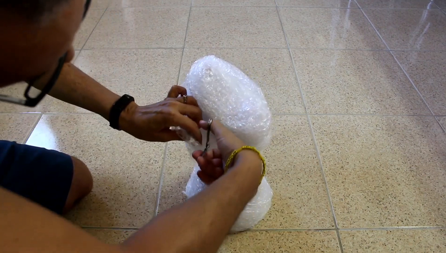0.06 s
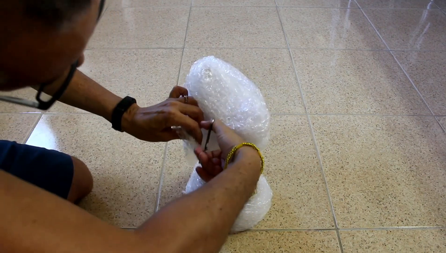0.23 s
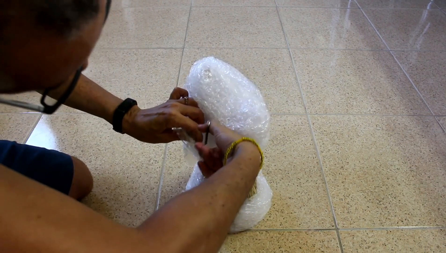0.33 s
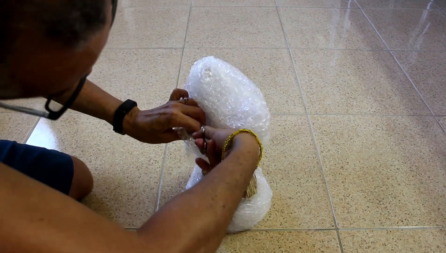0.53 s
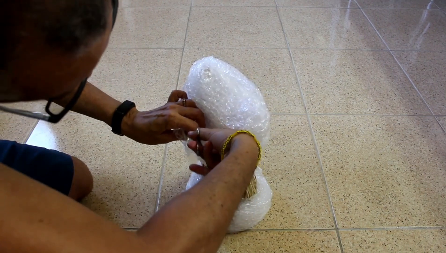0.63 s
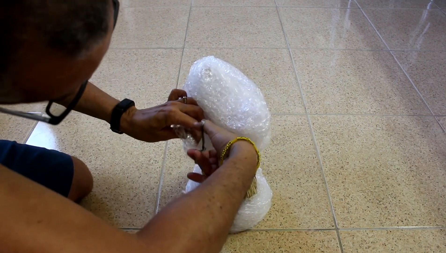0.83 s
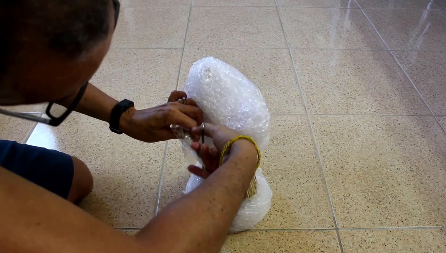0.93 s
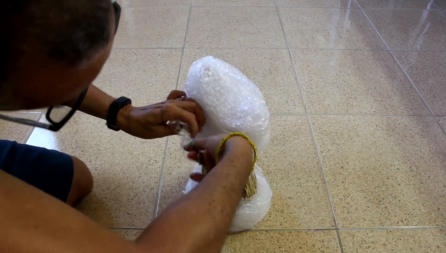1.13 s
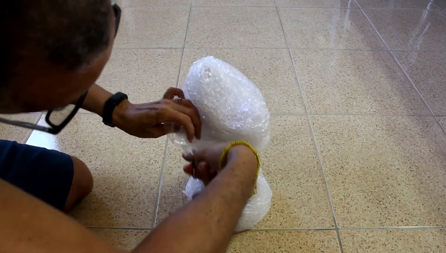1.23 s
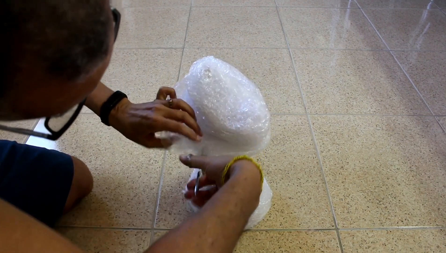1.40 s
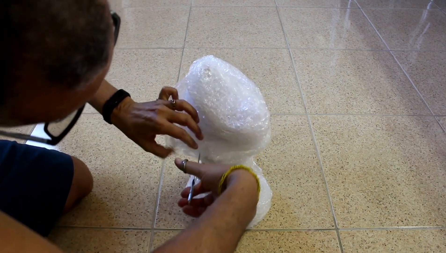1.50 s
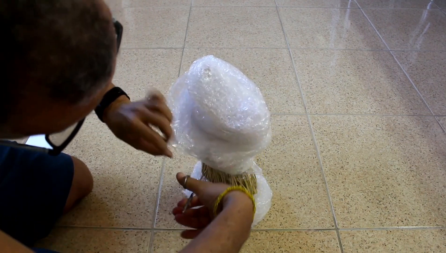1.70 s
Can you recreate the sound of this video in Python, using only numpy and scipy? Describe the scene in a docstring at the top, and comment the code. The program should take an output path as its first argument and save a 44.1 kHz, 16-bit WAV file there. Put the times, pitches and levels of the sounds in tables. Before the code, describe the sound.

Bubble wrap crinkles and pops sharply under scissors, with soft thuds over a low hum.

```python
"""In a bare, echoing room with a tiled floor, scissors work through bubble wrap around a parcel.
A low hum lies under everything, and the wrap crinkles in the hands as its tiny creases snap.
The film ticks under the blades, then bubbles burst in two sharp clusters, each with a bright echo.
Hands and scissors also bump the padded parcel, which answers with soft, dull thuds."""
import sys
import numpy as np
from scipy import signal
from scipy.fft import rfft, irfft
from scipy.io import wavfile

SR = 44100
rng = np.random.default_rng(int(sys.argv[2]) if len(sys.argv) > 2 else 0)


def wav_record(signal):
    """Record a signal, one row per channel, as 16-bit PCM in the file named by sys.argv[1]."""
    frames = np.transpose(np.atleast_2d(signal))
    bounded = np.clip(frames, -1, 1)
    # unit amplitude maps onto the largest positive 16-bit level
    quanta = np.round(bounded * 32767).astype(np.int16)
    wavfile.write(sys.argv[1], SR, quanta)


N = 77175
TIME = np.arange(N) / SR
BIN_HZ = np.maximum(np.arange(N // 2 + 1) * SR / N, 1)  # the frequency of each point in a spectrum


def from_db(db):
    """Turn decibels into a number to multiply by."""
    return 10 ** (np.asarray(db) / 20)


def rms_one(x):
    """Scale a sound so that its average strength (rms) is 1."""
    return x / np.sqrt(np.mean(x ** 2) + 1e-20)


def at_hz(points, hz):
    """Read between the rows of a frequency table, with all octaves equally wide."""
    row_hz, value = np.transpose(points)
    return np.interp(np.log(hz), np.log(row_hz), value)


def coloured(x, spectrum):
    """Turn each frequency up or down as a table says."""
    return irfft(rfft(x) * from_db(at_hz(spectrum, BIN_HZ)), N)


def resonate(x, hz, q):
    """Let through the sound around one pitch; a low q makes the band wide."""
    angle = 2 * np.pi * hz / SR
    width = np.sin(angle) / (2 * q)
    return signal.lfilter([width, 0, -width], [1 + width, -2 * np.cos(angle), 1 - width], x + 1e-18)


def low_pass(x, hz, order=2):
    """Soften everything above hz."""
    return signal.sosfilt(signal.butter(order, min(hz, SR / 2 - 1000), fs=SR, output="sos"), x)


def diffuse_noise():
    """Stereo noise arriving from all around: alike in the bass, nearly unrelated in the high treble."""
    # how alike left and right are: f/Hz, correlation (1 = the same)
    likeness = [(60, 0.84), (250, 0.89), (1000, 0.71), (2000, 0.61), (4000, 0.6), (7500, 0.25),
                (14000, -0.2)]
    alike = np.clip(at_hz(likeness, BIN_HZ), -1, 1)
    mid, side = rfft(rng.standard_normal((2, N)))
    return irfft(np.sqrt(1 + alike) * mid + np.sqrt(1 - alike) * side * [[1], [-1]], N)


def room_hum():
    """The room rumbles and hisses steadily, with three low tones that waver in loudness."""
    # tone of the rumble and hiss: f/Hz, relative level/dB
    noise_colour = [(25, -24), (42, -16), (56, 1.5), (75, -7.5), (100, -11.5), (140, -1.5), (200, -6.5),
                    (260, 0), (330, -9), (480, -3), (750, -13.5), (2000, -15.5), (6000, -19),
                    (12000, -27.5), (16000, -38)]
    # humming tones: f/Hz, level/dB
    hum_tones = [(57, -63), (179, -62.5), (243, -56.5)]
    sound = from_db(-46) * rms_one(coloured(diffuse_noise(), noise_colour))
    for hz, db in hum_tones:
        waver = rms_one(low_pass(rng.standard_normal(2 * N), hz=5.7)[N:])
        tone = np.sin(2 * np.pi * (hz * TIME + rng.random()))
        sound += from_db(db) * (1 + 0.66 * waver) * tone
    return sound


def room_echo():
    """The bare room answers a click with many reflections that swell, then die away band by band."""
    # time the echo takes to fade by 60 dB: f/Hz, t/s
    fade_times = [(150, 0.86), (500, 1), (1200, 0.89), (3000, 0.87), (7000, 0.83), (14000, 0.57)]
    # tone of the echo: f/Hz, relative level/dB
    echo_colour = [(100, 5.5), (400, 0), (900, 0.5), (1800, -1.5), (3200, -4), (5500, -1), (8000, 1.5),
                   (12000, 2), (15500, 1.5)]
    delay_s, build_s = 0.0036, 0.011
    spectrum, tail = rfft(diffuse_noise()), 0
    centres_hz = np.geomspace(100, 16000, 16)
    for hz, this_band in zip(centres_hz, np.eye(len(centres_hz))):
        band = irfft(spectrum * np.interp(np.log(BIN_HZ), np.log(centres_hz), this_band), N)
        tail += band * np.exp(-np.log(1000) * TIME / at_hz(fade_times, hz))
    swell = 1 - np.exp(-np.maximum(TIME - delay_s, 0) / build_s)
    return rms_one(coloured(tail, echo_colour) * swell) / np.sqrt(N)


def convolve(x, response):
    """Play a one-channel sound through a pattern of echoes."""
    return signal.fftconvolve(np.atleast_2d(x), np.atleast_2d(response), axes=1)[:, :N]


def wrap_crinkle(room):
    """Tiny creases of uneven size snap at random while the film is handled."""
    # how hard the wrap is handled: t/s, relative level/dB
    handling = [(0, -43.5), (.1, -46), (.2, -47.5), (.33, -40.5), (.47, -40.5), (.62, -39.5), (.8, -48.5),
                (.93, -40.5), (1.0, -38.5), (1.15, -45), (1.37, -37.5), (1.42, -35), (1.5, -41.5),
                (1.56, -46), (1.62, -49), (1.68, -73), (1.75, -64)]
    # tone of the creases: f/Hz, relative level/dB
    crease_colour = [(300, -27), (700, 1), (1500, 1.5), (3000, 3), (6000, -6.5), (10000, -11),
                     (15000, -23.5)]
    snaps_per_s, spread_db = 900, 4.5
    sizes = from_db(spread_db * np.minimum(rng.exponential(1, N), 4))
    signs = rng.choice([-1, 1], N)
    snaps = sizes * signs * (rng.random(N) < snaps_per_s / SR)
    loudness = from_db(np.interp(TIME, *np.transpose(handling)))
    film = rms_one(coloured(snaps, crease_colour)) * loudness
    return from_db(-8.5) * film + from_db(-2) * convolve(film, room)


def bubble_pops(room):
    """The blades snap the film or burst a bubble: one sharp pressure swing, then flutter and echoes."""
    # ticks and pops: t/s, peak level before echoes/dB, pitch f/Hz, treble edge f/Hz, extra room level/dB
    pops = [(.1190, -25.5, 1720, 3000, 0), (0.1825, -26, 2780, 5940, 5.5), (.2328, -19.5, 1500, 8900, -0.5),
            (.3729, -9.5, 1850, 5460, -1), (0.4531, -20.5, 4400, 11800, 2.5), (.5452, -4, 2730, 10300, 4.5),
            (.6022, -10.5, 2380, 7000, -2.5), (0.6035, -16, 3450, 9100, 4.5),
            (1.0153, -14.5, 1620, 13000, 7), (1.0166, -20.5, 1610, 4000, 0),
            (1.0218, -14.5, 1410, 3020, -1), (1.0628, -5.5, 3500, 12900, 2.5)]
    # echoes off the hands, parcel and floor: rough delay t/s, relative level/dB
    near_echoes = [(.0013, -6), (.0030, -6), (.0062, -6.5), (0.0143, -17)]
    flaps_per_s, flutter_fade_s = 1500, 0.0039
    direct, into_room = np.zeros((2, N))
    for start_s, db, hz, edge_hz, room_db in pops:
        click = np.zeros(N)
        click[int(start_s * SR)] = -1
        pulse = low_pass(resonate(click, hz, q=0.97), edge_hz)
        pulse *= from_db(db) / np.abs(pulse).max()
        flaps = (rng.random(N) < flaps_per_s / SR) * rng.standard_normal(N)  # the torn film flutters
        repeats = flaps * from_db(-3) * np.exp(-TIME / flutter_fade_s)
        repeats[0] = 1  # the pop itself
        for delay_s, echo_db in near_echoes:
            repeats[int(delay_s * rng.uniform(0.9, 1.1) * SR)] += from_db(echo_db)
        direct = direct + convolve(pulse, repeats)
        into_room += pulse * from_db(room_db)
    return direct + from_db(8.5) * convolve(into_room, room)


def parcel_bumps(room):
    """The padded parcel answers a push with a dull thud that dies quickly."""
    # bumps of hands and scissors: t/s, level before rise and fade/dB, f/Hz, fade t/s
    bumps = [(0.233, -30.5, 390, 0.011), (.372, -33, 345, .012), (1.016, -35, 190, .03),
             (1.026, -36, 620, 0.042), (1.063, -37, 220, 0.023), (1.408, -36.5, 455, 0.049),
             (1.421, -33, 188, 0.027), (1.55, -47, 220.5, 0.094)]
    rise_s, q = 0.004, 1.23
    thuds = 0
    for start_s, db, hz, fade_s in bumps:
        age = np.maximum(TIME - start_s, 0)
        body = rms_one(resonate(resonate(rng.standard_normal(N), hz, q), hz, q))
        thuds += from_db(db) * body * (1 - np.exp(-age / rise_s)) * np.exp(-age / fade_s)
    return thuds + from_db(-3.5) * convolve(thuds, room)


def scene():
    """Pops, bumps and crinkles echo in the same room, over its hum."""
    room = room_echo()
    return bubble_pops(room) + parcel_bumps(room) + wrap_crinkle(room) + room_hum()


def record(dry):
    """The shaded left sound inlet hears less bass and middle; both sides lose the highest treble."""
    left, right = dry
    shade_db, cutoff_hz = -8.5, 15700
    left = left + (from_db(shade_db) - 1) * low_pass(left, hz=4200, order=1)
    treble_cut = signal.ellip(10, 0.2, 80, cutoff_hz, fs=SR, output="sos")
    return signal.sosfilt(treble_cut, [left, right])


dry = scene()
out = record(dry)
wav_record(out)
```